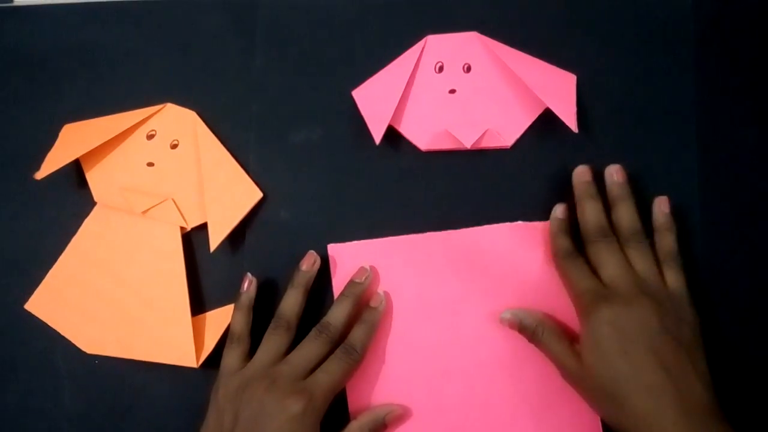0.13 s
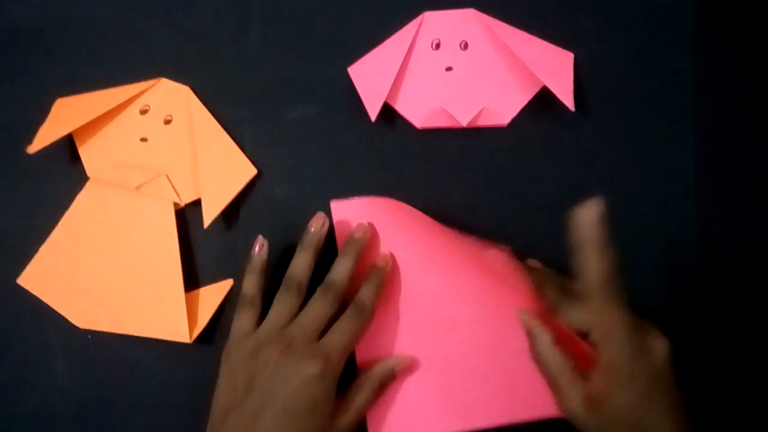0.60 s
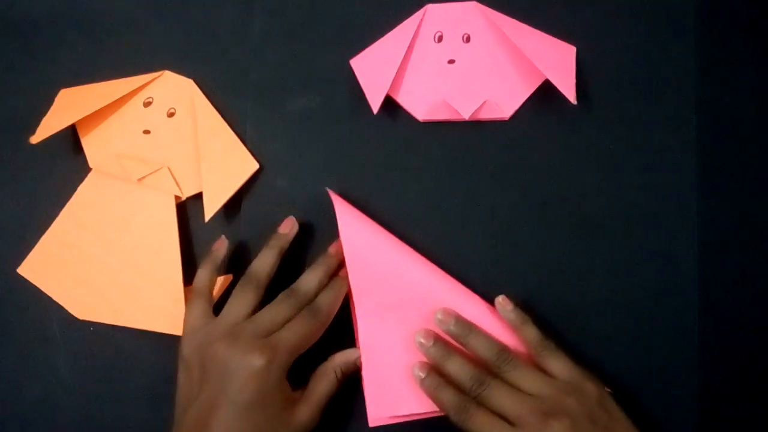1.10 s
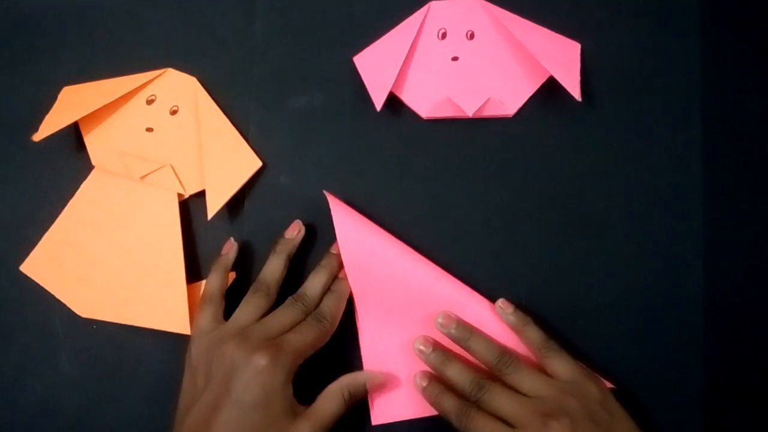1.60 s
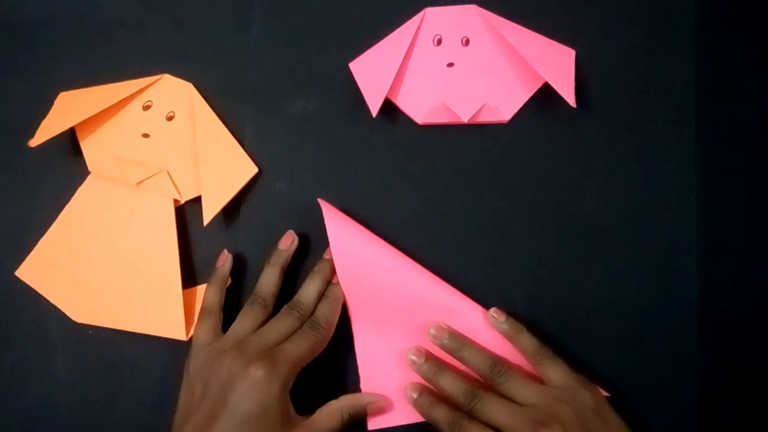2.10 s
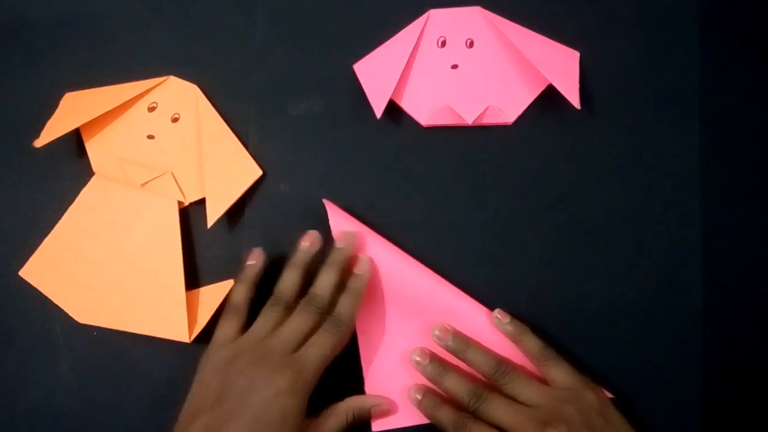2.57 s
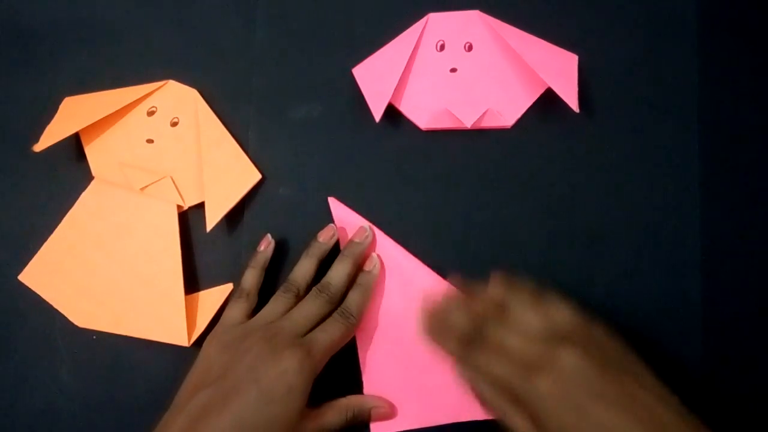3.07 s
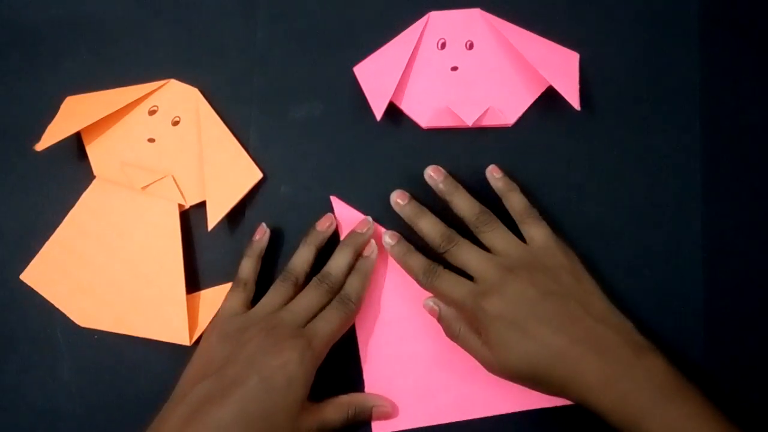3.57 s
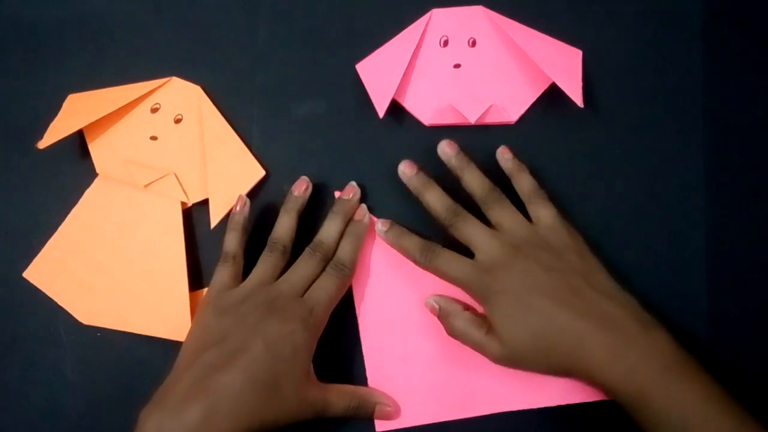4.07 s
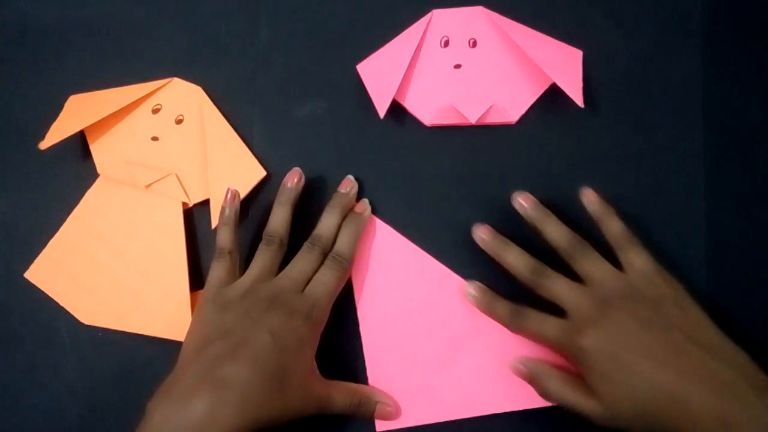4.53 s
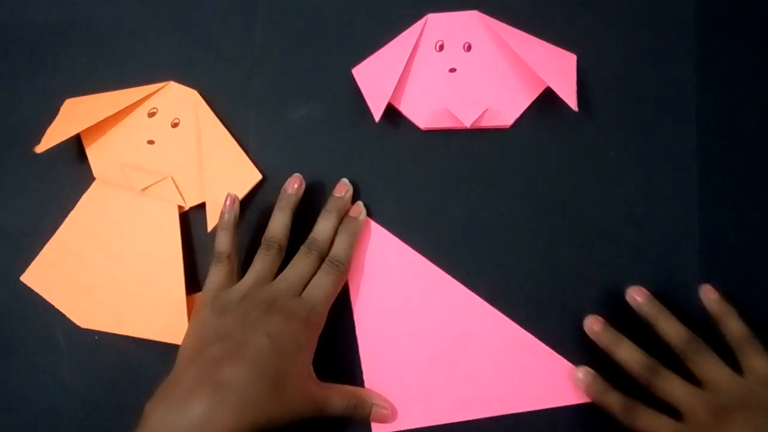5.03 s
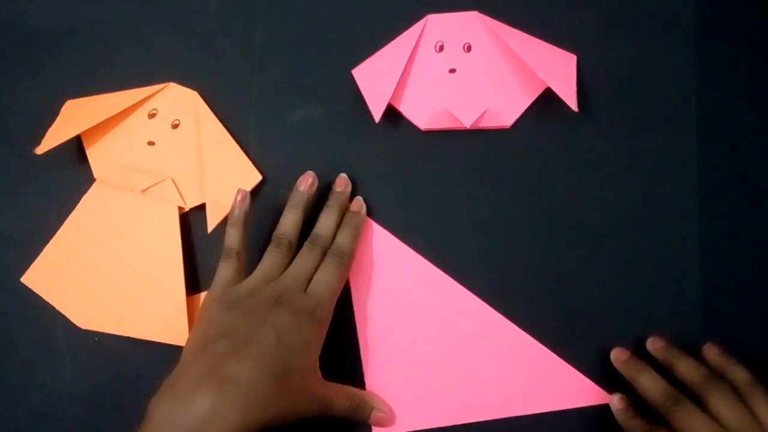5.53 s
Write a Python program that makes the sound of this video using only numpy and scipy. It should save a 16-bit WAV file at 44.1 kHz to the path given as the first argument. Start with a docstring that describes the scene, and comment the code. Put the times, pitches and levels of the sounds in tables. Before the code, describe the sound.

Hands fold a sheet of paper on a table: dry rustles and scrapes, a few sharp snaps, and one long slide along the crease.

```python
"""Hands fold a square of paper on a table under a phone. In order of time: short strokes of friction noise,
the corner lifted and folded over, more strokes, a reach, the tip pinned, one long slide down the crease.
Scuffs of filtered friction, resonant snaps of buckling folds and soft blows on the table fall among them.
Scattered echoes of a small room answer the rubbing and the snaps; low random room tone lies under it all.
The phone's two ports hear it in opposite polarity, rubs and snaps through each one's own treble resonance."""
import sys
import numpy as np
from scipy import signal
from scipy.fft import rfft, irfft, next_fast_len
from scipy.io import wavfile
from scipy.ndimage import uniform_filter1d, map_coordinates

SR = 44100
rng = np.random.default_rng(int(sys.argv[2]) if len(sys.argv) > 2 else 0)


def gain_from_decibels(decibels):
    """Convert decibel values to linear amplitude factors."""
    exponent = np.asarray(decibels, float) / 20
    return 10 ** exponent


def unload_wav(signal):
    """Save mono or channel-first audio to the path in sys.argv[1] as 16-bit WAV at rate SR, clipped to [-1, 1]."""
    wavfile.write(
        sys.argv[1],
        SR,
        np.round(np.clip(np.atleast_2d(signal).T, -1, 1) * 32767).astype(np.int16),
    )


N = 249158
SIZE = next_fast_len(N + SR)  # transform length, with space for the echoes
HZ = np.arange(SIZE // 2 + 1) * SR / SIZE + 1e-3  # kept above zero for the logarithm
TIME = np.arange(N) / SR

# Levels of rubs, scuffs and snaps are those ahead of the port resonances.
# short strokes of a finger or the sheet: (t/s, length/s, rub level/dB, contact resonance f/Hz,
# flexing free sheet level/dB, dry skin hiss level/dB), the last two relative to the rub
SHORT_STROKES = [(0.101, 0.062, -55, 5000, -37, -17.5), (0.208, 0.076, -41.5, 4400, -36, -10),
                 (0.793, 0.056, -52.5, 6000, -16, -6), (0.938, 0.074, -48, 4300, -3, -11.5),
                 (1.007, 0.088, -56, 4470, -7, -9), (1.087, 0.088, -57, 5700, -4, -5),
                 (1.152, 0.12, -56, 5000, -10, -19), (1.259, 0.14, -49, 4500, -10, -12.5),
                 (1.377, 0.08, -60, 5770, 1.5, -5.5), (1.498, 0.13, -59.5, 5480, -3, -9.5),
                 (1.679, 0.087, -65.5, 5570, -3.5, -11), (1.76, 0.12, -60.5, 5200, -4, -12.5),
                 (1.885, 0.12, -57.5, 5800, -8, -8), (2.095, 0.059, -58, 5740, -6, -10.5),
                 (2.228, 0.065, -54.5, 2140, -4.5, -7.5), (2.68, 0.068, -56, 5000, -1, -7.5),
                 (2.764, 0.056, -60, 5330, -11, -24), (3.342, 0.079, -60, 5000, 0.5, -19),
                 (4.008, 0.093, -69, 5000, -16, -7.5), (4.096, 0.1, -56.5, 2930, -8, -11.5),
                 (4.212, 0.099, -55, 4860, -13, -17.5), (4.858, 0.17, -59.5, 6110, -26, -14),
                 (5.149, 0.083, -54, 5450, -23, -7), (5.588, 0.074, -66, 5000, -22, -21)]
# long slides, one table each: lifting the corner, folding over, reaching, pinning the tip, running down
# the crease: (t/s, rub level/dB, free sheet level/dB, dry skin level/dB), the last two relative to the rub
LONG_SLIDES = [
    [(0.295, -55, -3, -13), (0.325, -44, -22, -6), (0.373, -52, -3, -2.5), (0.429, -59, -15, -4),
     (0.47, -54, 0, -26)],
    [(0.505, -50, 1, -14), (0.535, -57.5, -9, -11), (0.581, -39.5, -9, -15), (0.647, -36.5, -15.5, -12),
     (0.735, -41, -10, -10), (0.92, -67.5, 0, -9.5)],
    [(3.05, -57.5, -10, -7), (3.092, -58.5, -1, -18), (3.152, -47.5, -10.5, -13), (3.18, -59.5, -5, -7),
     (3.25, -92, -12.5, -26)],
    [(3.69, -58, -15, -21), (3.726, -64, -19.5, -23), (3.77, -55, -15, -12.5), (3.902, -55.5, -30, -13),
     (3.95, -89, -18, -15)],
    [(4.325, -52.5, -2, -8), (4.392, -50, -8.5, -4.5), (4.484, -47.5, -12.5, -9.5), (4.75, -45.5, -17, -9),
     (4.95, -56, -19, -3), (5.12, -63.5, -19, -2.5)],
]
# pocket of air at the contact in each slide: (f/Hz, extra gain over that in a stroke/dB)
SLIDE_POCKETS = [(5100, 0.3), (5000, 2), (6000, -0.2), (5100, -2.5), (4660, 0.5)]
# hands that rest on the sheet still creep: rub level/dB, then free sheet and dry skin relative to it/dB
RESTING_DB = (-76, -10.5, -29.5)
# where the hands work: (t/s, lag of left port/(1/1.03 us), spread of the rubbing 0-1, small = one spot)
HAND_PLACES = [(0.2, 19, 0.051), (0.76, 39.6, 0.39), (0.9, 47, 1), (3.8, 70, 1), (4.3, 26, 0.93)]
# share common to both ports when the spread is 1: free sheet, contact, skin
COMMON_SHARES = (0.68, 0.68, 0.42)
# reflection of the rub off the table at the right port: (t/s, delay/(1/1.005 us), level/dB)
TABLE_REFLECTION = [(4.29, 450, -29.5), (4.34, 369, 0.5), (4.7, 353, -11.5), (4.95, 250, -20),
                    (5.14, 340, -40)]
# spectra of friction: (f/Hz, relative level/dB)
SHEET_SPECTRUM = [(350, -50), (600, -5.5), (1300, -5), (2000, -0.5), (2800, -6.5), (3500, -18),
                  (5000, -60.5)]
CONTACT_SPECTRUM = [(1800, -26), (2600, -11.5), (3400, -2), (4800, -4.5), (6400, -1.5), (7600, -15.5),
                    (9000, -44.5), (12000, -59.5)]
SKIN_SPECTRUM = [(5500, -36), (7300, -1.5), (8400, -3), (10500, -2), (12500, -10.5), (15000, -14),
                 (17000, -26.5)]
# short scuffs of a nail on an edge: (t/s, level before the rise/dB, decay time constant/ms)
NAIL_SCUFFS = [(0.475, -40, 5.2), (0.494, -43.5, 3.2), (0.933, -55, 9.5), (1.175, -45, 2.5),
               (1.277, -45.5, 2.5), (2.688, -57, 2.8), (2.954, -60, 1.7), (5.146, -47, 3.5)]
# snaps: (t/s, peak level/dB, ring f/Hz, width of each of two stages/Hz, mean rebound interval/ms,
# treble lag of left port/us, crack relative to ring/dB, gain of all rebounds/dB)
FOLD_SNAPS = [(2.9055, -29, 2030, 790, 0.85, 233, -43, 5), (2.9065, -34.5, 3440, 1200, 1.32, 100, -27, 13),
              (3.044, -32, 6400, 6000, 0.96, 28.8, 2, 5), (3.4275, -42.5, 4500, 3500, 0.97, 160, -19, 8),
              (3.6117, -3.5, 5190, 1450, .75, 75, -16, -1), (4.024, -44, 5000, 4012, 0.77, 60, -23.5, 2),
              (4.2912, -15.5, 6030, 2190, 0.62, 40, -13.5, 5),
              (4.2914, -8, 3330, 2700, 0.95, 7.2, -14, 6.5), (4.326, -27, 3200, 1800, 1.38, 26, -20, 8),
              (5.198, -38.5, 6000, 6000, .8, 47, -9, -6)]
# successive slaps of the fold against the table: level/dB, before the gain of all rebounds
REBOUND_LEVELS = (-9.5, -17, -22)
# spectrum of a snap: (f/Hz, level/dB)
SNAP_SPECTRUM = [(300, -49.5), (1200, -16), (2000, -7), (3000, -5), (7000, -6), (10000, -14.5),
                 (16000, -41)]
# soft blows on the table top: (t/s, peak level/dB, f/Hz, width of each of three stages/Hz)
TABLE_BLOWS = [(2.465, -39.5, 201, 201), (4.2915, -32.5, 950, 1020), (4.327, -34.5, 730, 500),
               (5.459, -34, 230, 249.5)]
# flat surfaces that send one clear echo: (delay t/s, level over the scattered echoes before decay/dB)
CLEAR_ECHOES = [(0.015, 25), (0.032, 23)]
# reflection spectrum of the walls: (f/Hz, level/dB)
WALL_SPECTRUM = [(800, 2), (2300, 1.5), (3500, -1.5), (5000, -4.5), (9000, -3), (15000, -15.5)]
# spectral density of the room tone: (f/Hz, relative level per Hz/dB)
TONE_SPECTRUM = [(21, -34.5), (36, -15.5), (49, -2.5), (78, -9), (135, -2.5), (170, -8.5), (405, -14),
                 (727, -16.5), (1180, -18.5), (1410, -29.5), (1520, -25), (1640, -33), (6350, -38),
                 (15500, -62.5)]
# room tone, left minus right: (f/Hz, level/dB)
TONE_BALANCE = [(60, 8.5), (110, 5.5), (200, 3.5), (1290, 2), (2380, 4), (4400, 12.5), (8120, -1.5),
                (15000, 8)]
# room tone: (f/Hz, share common to both ports)
TONE_COMMON = [(60, 0.81), (700, 0.55), (1200, 0.35), (1500, .05)]
# treble resonance of each port: (f/Hz, width/Hz, level/dB)
LEFT_RESONANCE = (4670, 1000, 6.2)
RIGHT_RESONANCE = (2160, 2400, 1.63)

STROKE_RISE_S, STROKE_FALL_S, TAIL_S = 0.029, 0.031, 0.08


def over_hz(table, hz=HZ):
    """Interpolation of a (f/Hz, value) table along a logarithmic frequency axis."""
    f, value = np.transpose(table)
    return np.interp(np.log(hz), np.log(f), value)


def shaped(x, gain):
    """Linear filtering: the spectrum is multiplied by a frequency response."""
    return irfft(rfft(x, SIZE) * gain, SIZE)[..., :N]


def unit(x):
    """Normalization to an rms of 1."""
    return x / np.sqrt(np.mean(x ** 2))


def ring(centre_hz, width_hz, hz=HZ):
    """Response of one damped resonator, gain 1 at its centre."""
    return 1j * hz * width_hz / (centre_hz ** 2 - hz ** 2 + 1j * hz * width_hz)


def walk(rate):
    """Slow random modulation: levels held 1 / rate s and slewed twice; spread near 1."""
    k = int(SR / rate)
    held = np.repeat(rng.standard_normal(N // k + 1), k)
    return 1.45 * uniform_filter1d(uniform_filter1d(held, k), k)[:N]


def ramp(x):
    """Raised-cosine step from 0 to 1."""
    return np.sin(np.pi / 2 * np.clip(x, 0, 1)) ** 2


def delayed(x, samples):
    """Propagation delay that varies with time, by interpolation between samples."""
    return map_coordinates(x, [np.arange(N) - samples], mode="mirror")


def panned(db):
    """Level difference, left minus right, split evenly between the ports."""
    return gain_from_decibels(np.array([[db], [-db]]) / 2)


def fibres():
    """Stick-slip friction: dense catches of unequal size over smooth sliding noise, in patches."""
    caught = rng.random(N) < 4000 / SR  # 4000 catches per second
    catches = caught * rng.standard_normal(N) * gain_from_decibels(2.0 * rng.exponential(size=N))
    return unit(unit(catches) + 1.06 * rng.standard_normal(N)) * gain_from_decibels(1.32 * walk(60))


def friction():
    """Partial coherence: one friction drives sheet, contact and skin; each port adds a part of its own."""
    common = fibres()
    t, lag, spread = np.transpose(HAND_PLACES)
    late = delayed(common, np.interp(TIME, t, lag) * SR / 1030000.0)
    shared = np.array([late, common])
    own = np.array([fibres(), fibres()])
    spread_now = np.interp(TIME, t, spread)
    parts = []
    for spectrum, share in zip((SHEET_SPECTRUM, CONTACT_SPECTRUM, SKIN_SPECTRUM), COMMON_SHARES):
        alike = np.clip(1 - (1 - share) * spread_now, 0, 1)
        mixed = alike * shared + np.sqrt(1 - alike ** 2) * own
        swell = gain_from_decibels(1.17 * walk(30))  # each part swells on its own
        parts.append(unit(shaped(mixed, gain_from_decibels(over_hz(spectrum)))) * swell)
    return parts


def touching(start, length):
    """Duration of contact: the samples of one touch with its tail."""
    return (TIME >= start) & (TIME < start + length + TAIL_S)


def touch(parts, start, length, db, contact_hz, sheet_db, skin_db, clear_db=0):
    """Resonance of the contact pocket, clearer for light pressure; the touch rises, holds and lets go."""
    on = touching(start, length)
    sheet, rub, skin = (part[:, on] for part in parts)
    t = TIME[on] - start
    size = next_fast_len(len(t))
    hz = np.arange(size // 2 + 1) * SR / size
    lightness_db = np.clip(-50 - np.max(db), -10, 10)
    pocket_gain = gain_from_decibels(7 + clear_db + 0.44 * lightness_db)
    pocket = 1 + (pocket_gain - 1) * ring(contact_hz, 500, hz)
    contact, flex = irfft(rfft([rub, sheet], size) * pocket, size)[..., :len(t)]
    let_go = np.exp(-np.clip(t - length + STROKE_FALL_S, 0, None) / 0.024)
    pressure = ramp(t / STROKE_RISE_S) * let_go * ramp((length + TAIL_S - t) / TAIL_S * 2)
    return on, pressure * gain_from_decibels(db) * (unit(contact) + gain_from_decibels(sheet_db) * flex + gain_from_decibels(skin_db) * skin)


def strokes(parts):
    """Sliding friction under changing pressure, with a table reflection at the right port."""
    sheet, rub, skin = parts
    rest_db, rest_sheet_db, rest_skin_db = RESTING_DB
    out = gain_from_decibels(rest_db) * (rub + gain_from_decibels(rest_sheet_db) * sheet + gain_from_decibels(rest_skin_db) * skin)
    for row in SHORT_STROKES:
        on, sound = touch(parts, *row)
        out[:, on] += sound
    for slide, (contact_hz, clear_db) in zip(LONG_SLIDES, SLIDE_POCKETS):
        t, *columns = np.transpose(slide)
        start, length = t[0] - STROKE_RISE_S / 2, t[-1] - t[0] + STROKE_FALL_S
        now = TIME[touching(start, length)]
        db, sheet_db, skin_db = (np.interp(now, t, c) for c in columns)
        on, sound = touch(parts, start, length, db, contact_hz, sheet_db, skin_db, clear_db)
        out[:, on] += sound
    t, delay, db = np.transpose(TABLE_REFLECTION)
    reflected = delayed(out[1], np.interp(TIME, t, delay) * SR / 1005000.0)
    out[1] += gain_from_decibels(np.interp(TIME, t, db)) * reflected
    return out * panned(0.5)


def scuffs(parts):
    """Brief broadband friction of a nail: a fast rise against an exponential decay."""
    _, rub, skin = parts
    envelope = 0
    for t, db, decay_ms in NAIL_SCUFFS:
        decay = np.exp(-np.abs(TIME - t) * 1000 / decay_ms)
        envelope = envelope + gain_from_decibels(db) * ramp((TIME - t) / 0.0017) * decay
    grain = unit(shaped(rub, ring(6000, 12000) ** 2)) + gain_from_decibels(-3) * skin
    return envelope * panned(3.5) * grain


def snaps():
    """Elastic buckling: a jolt rings, then ever weaker, lower rebounds; the walls get a broader ring."""
    size, lead = 1024, 32
    near, far = np.zeros((2, N + size)), np.zeros(N + size)
    hz = np.arange(size // 2 + 1) * SR / size + 1e-3
    skirt = gain_from_decibels(over_hz(SNAP_SPECTRUM, hz))
    bend = 1 + (2454 / hz) ** 2  # diffraction: bass bends round the phone and reaches both ports together
    scatter = rng.standard_normal((len(FOLD_SNAPS), len(REBOUND_LEVELS), 2))
    for row, chance in zip(FOLD_SNAPS, scatter):
        t, db, ring_hz, width_hz, again_ms, lag_us, crack_db, slap_db = row
        jolts = ring(ring_hz, width_hz, hz) ** 2 + gain_from_decibels(crack_db)
        for k, back_db in enumerate(REBOUND_LEVELS, 1):
            late_s = again_ms / 1000 * (k + 0.073 * chance[k - 1, :, None])
            slap = np.exp(-2j * np.pi * hz * late_s) * ring(ring_hz * 0.783 ** k, width_hz, hz) ** 2
            jolts = jolts + gain_from_decibels(back_db + slap_db) * slap
        arrival_s = lead / SR + np.array([[lag_us * 1e-6], [0]]) / bend
        wave = irfft(jolts * skirt * np.exp(-2j * np.pi * hz * arrival_s), size)
        peak = np.abs(wave).max()
        at = int(t * SR) - lead
        near[:, at:at + size] += gain_from_decibels(db) * wave / peak
        broad = irfft((ring(ring_hz, 3 * width_hz, hz) ** 2 + gain_from_decibels(crack_db)) * skirt, size)
        same_rms = np.sqrt(np.mean(wave ** 2) / np.mean(broad ** 2))
        far[at:at + size] += gain_from_decibels(db - 2.5) * broad * same_rms / peak
    return near[:, :N], far[:N]


def thumps():
    """Impulse response of the table top: soft blows ring briefly, later at the left port, weaker at the right."""
    out = 0
    for t, db, hz, width_hz in TABLE_BLOWS:
        impulse = 1.0 * (np.arange(N) == int(t * SR))
        wave = shaped(impulse, ring(hz, width_hz) ** 3)
        out = out + gain_from_decibels(db) * wave / np.abs(wave).max()
    left = shaped(out, np.exp(-2j * np.pi * HZ * 160e-6))  # 160 us late
    return np.array([left, 0.63 * out])


def room(x):
    """Diffuse reverberation: after a gap, echoes thicken and decay, treble first, independent at each port."""
    t60_s, treble_t60_s, treble_from_hz = 0.43, 0.086, 9100
    t = np.arange(SR // 2) / SR
    # table and hands scatter sound back before the walls do: the rise starts from 0.69 squared
    rise = np.clip(t / 0.02, 0.69, 1) ** 2 * (t > 0.00096)
    echoes = rng.standard_normal((2, len(t)))
    echoes = echoes * (1 + np.abs(echoes) * np.exp(-t / 0.036)) * rise  # early echoes are more uneven
    for late_s, db in CLEAR_ECHOES:
        echoes[:, int(late_s * SR)] = gain_from_decibels(db)
    decayed = echoes * np.exp(-np.log(1000) * t / t60_s)
    tail = rfft(decayed, SIZE)
    treble_tail = rfft(echoes * np.exp(-np.log(1000) * t / treble_t60_s), SIZE)
    low = 1 / (1 + (HZ / treble_from_hz) ** 8)
    power = np.sum(decayed ** 2, axis=1, keepdims=True)
    response = (low * tail + (1 - low) * treble_tail) / np.sqrt(power)
    return gain_from_decibels(-6.5) * shaped(x, response * gain_from_decibels(over_hz(WALL_SPECTRUM)))


def room_tone():
    """Partially coherent random noise: the bass is largely shared by both ports and louder at the left."""
    a, b = rfft(rng.standard_normal((2, SIZE)))
    alike = np.clip(over_hz(TONE_COMMON), 0, 1)
    lean = gain_from_decibels(over_hz(TONE_BALANCE) / 2)
    right = alike * a + np.sqrt(1 - alike ** 2) * b
    pair = np.array([a * lean, right / lean]) * gain_from_decibels(over_hz(TONE_SPECTRUM))
    return gain_from_decibels(-54 + 1.0 * walk(5.15)) * unit(irfft(pair, SIZE)[:, :N])


def port_responses():
    """Resonance of each port; the phone's body shades the top from the right one."""
    ports = [1 + (gain_from_decibels(db) - 1) * ring(hz, width) for hz, width, db in (LEFT_RESONANCE, RIGHT_RESONANCE)]
    shade = np.sqrt(1 + (HZ / 10500) ** 8)
    return np.array([ports[0], ports[1] / shade])


def scene():
    """Superposition: rubs, snaps and their echoes pass the ports; thumps and room tone are added."""
    parts = friction()
    rubs = strokes(parts) + scuffs(parts)
    near, far = snaps()
    echoes = room(gain_from_decibels(-3) * rubs + far)
    return shaped(rubs + near + echoes, port_responses()) + thumps() + room_tone()


def top_cut(x):
    """Nothing passes above the cut-off."""
    return signal.sosfilt(signal.butter(12, 16460, fs=SR, output="sos"), x)


def record(dry):
    """Polarity inversion of the right channel."""
    mix = dry * np.array([[1], [-1]])
    return top_cut(mix)


dry = scene()
out = record(dry)
unload_wav(out)
```